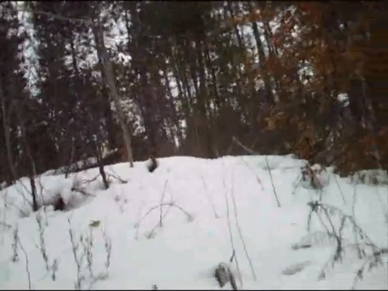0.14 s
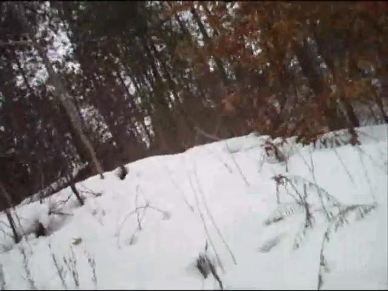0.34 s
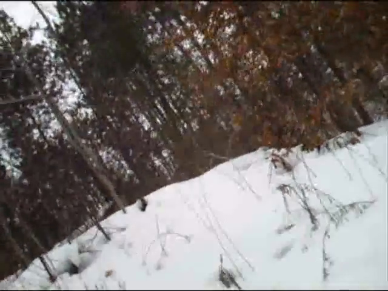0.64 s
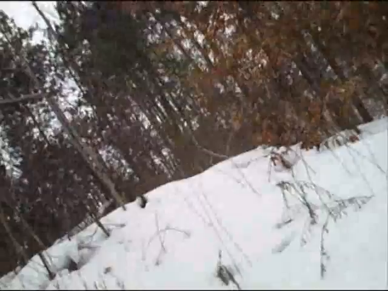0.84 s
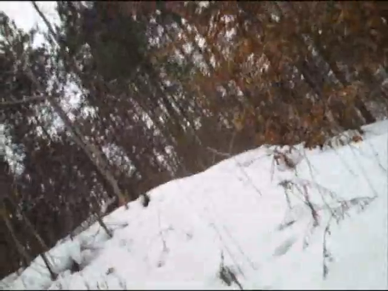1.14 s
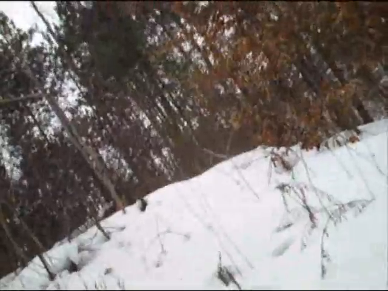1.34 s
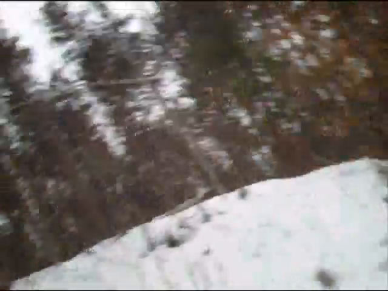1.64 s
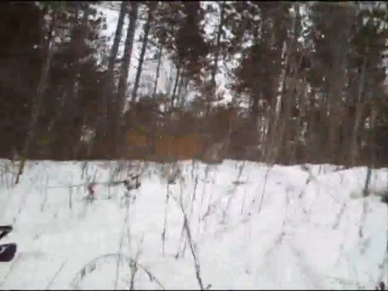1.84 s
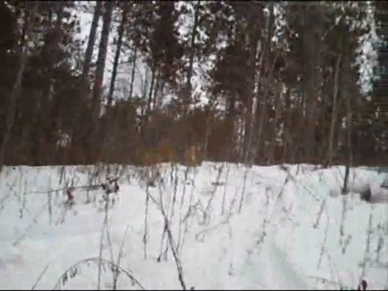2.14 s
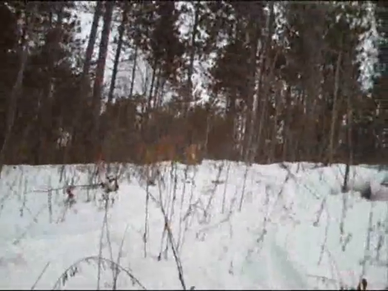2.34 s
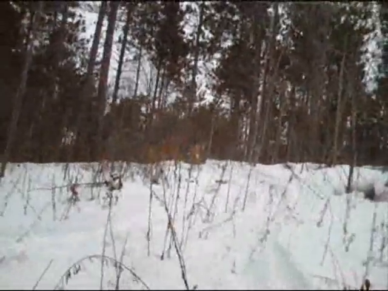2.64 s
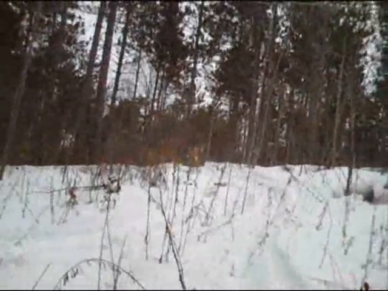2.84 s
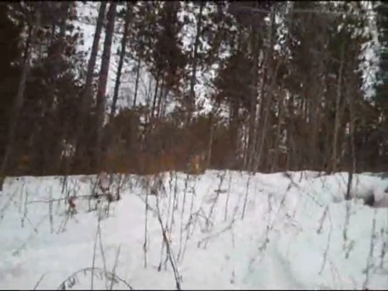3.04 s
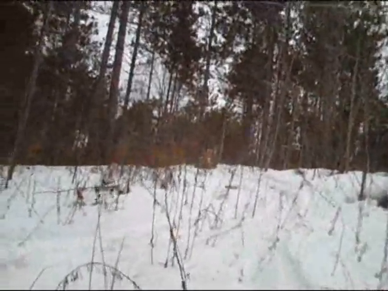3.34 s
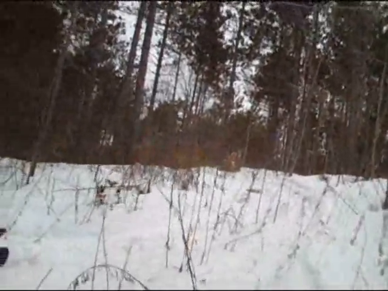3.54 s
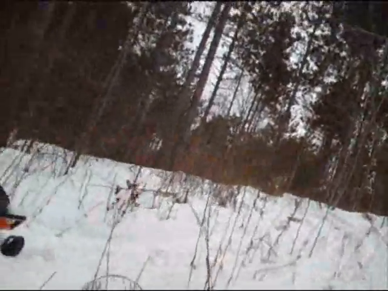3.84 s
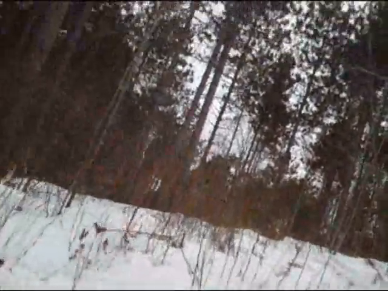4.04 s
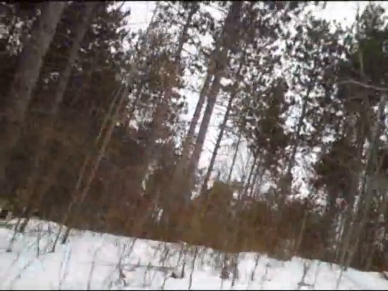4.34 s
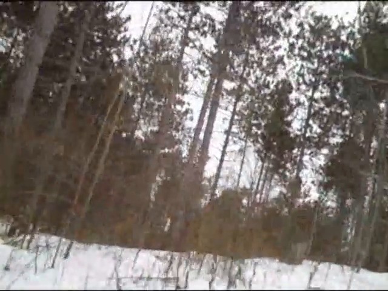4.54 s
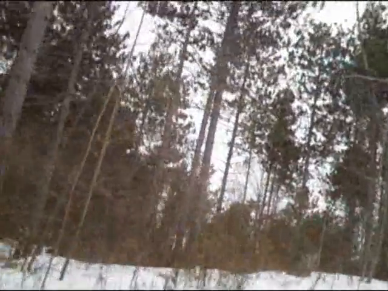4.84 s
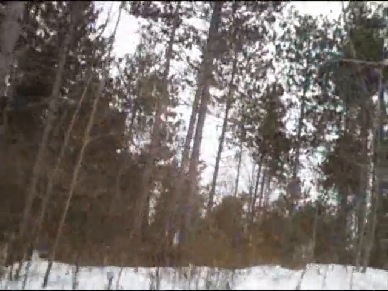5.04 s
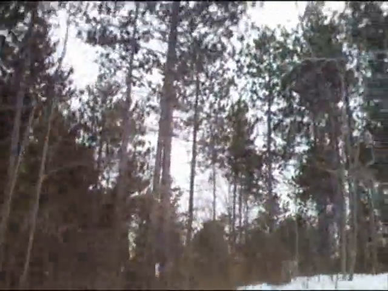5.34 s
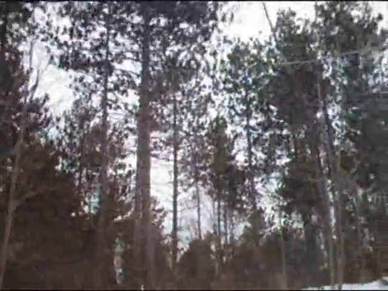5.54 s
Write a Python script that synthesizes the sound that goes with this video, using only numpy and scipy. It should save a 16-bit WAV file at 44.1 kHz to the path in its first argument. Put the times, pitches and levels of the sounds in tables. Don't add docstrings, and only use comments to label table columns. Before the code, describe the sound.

A slow old snowmobile engine throbs deep and lumpy, quickening, while loose parts rattle and sharp knocks strike the camera case in crunchy lo-fi sound.

```python
import sys
import numpy as np
from scipy import signal
from scipy.io import wavfile
from scipy.ndimage import uniform_filter1d, map_coordinates

SR = 44100
rng = np.random.default_rng(int(sys.argv[2]) if len(sys.argv) > 2 else 0)


def undo_db(level):
    steps = np.asarray(level, float) / 20
    return 10 ** steps


def log_audio(samples):
    frames = np.atleast_2d(samples).T
    limited = np.clip(frames, -1, 1)
    pcm = np.round(limited * 32767).astype(np.int16)
    wavfile.write(sys.argv[1], SR, pcm)


N = 250488
TIME = np.arange(N) / SR
MOUNT_HZ = 59
ROAR_SLOPE = 0.93

# [t/s, size 0-1]
HALF_TURN = [
    (0, 0.35),
    (.6, 1),
    (1.6, 0.78),
    (2.0, 0.1),
    (5.68, 0),
]


def curves(table):
    s, *columns = np.transpose(table)
    return [np.interp(TIME, s, c) for c in columns]


def ring(x, hz, width):
    return signal.lfilter(*signal.iirpeak(hz, hz / width, fs=SR), x)


def body(x, modes):
    y = 0
    for k, (hz, width, db) in enumerate(modes):
        wide = 1.61 * width
        y = y + (-1) ** k * undo_db(db) * ring(ring(x, hz, wide), hz, wide)
    return y / np.std(y)


def walk(rate):
    k = int(SR / rate)
    held = np.repeat(rng.standard_normal(N // k + 1), k)
    y = uniform_filter1d(uniform_filter1d(held, k), k)[:N]
    return y / np.std(y)


def orders(hz, sway_db, heave_db):
    # [t/s, level/dB]
    wobble = [(0, -35.5), (.6, -27), (1.9, -24), (2.4, -39), (2.85, -33), (3, -48), (3.8, -42), (4.1, -47),
              (4.65, -26), (5.4, -24), (5.68, -38)]
    order_levels = [-13, -11, -12.5]
    lift_db, lift_hz = 14.5, 8.9
    k = np.arange(2, 5)[:, None]
    lift = lift_db / (1 + ((k * hz - MOUNT_HZ) / lift_hz) ** 2)
    db = sway_db + np.array(order_levels)[:, None] + lift
    cancel = -2 * np.clip(curves(HALF_TURN)[0], 0, 1)
    db = db + (k == 2) * heave_db + (k == 3) * cancel
    return [curves(wobble)[0], *db]


def shake(hz, turns, order_db, mount_db):
    lead = 1.05 * curves(HALF_TURN)[0]
    crank = 0
    for k, db in enumerate(order_db):
        level = undo_db(db + 3.5 + 0.37 * walk(12.0))
        crank = crank - level * np.cos(2 * np.pi * (k + 1) * turns + (k == 1) * lead)
    nearest = np.clip(np.round(MOUNT_HZ / hz), 1, 4)
    apart_hz = hz * np.abs(MOUNT_HZ / hz - nearest)
    free = np.clip(apart_hz / 5 - .4, 0, 1)
    mount_level = undo_db(4.0 + 0.37 * walk(15))
    mount = mount_level * np.sin(2 * np.pi * np.cumsum(MOUNT_HZ * (1 + 0.01567 * walk(8))) / SR)
    jolts = body(rng.standard_normal(N), [(54.5, 5.0, 1), (33.7, 18, 0.5), (81.4, 16, 0.81)])
    top_db = -13
    return crank + undo_db(np.minimum(mount_db, top_db)) * (free * mount + undo_db(-14.0) * jolts)


def exhaust(turns, beat_db, roar_db):
    # [f/Hz, width/Hz, level/dB]
    pipe_modes = [(110.4, 15.2, 14), (137, 33, -4), (207.2, 23, -4.5), (396, 207, -21.5)]
    roar_modes = [(175, 86, 4.5), (404, 77, 0.5), (459, 49, -2.5), (585, 82, -2.5), (869, 120, -5)]
    muffler_modes = [(93.4, 12.5, 4), (226, 75, -12), (291, 8.8, -15.5)]
    count = (2 * turns).astype(int)
    half = np.clip(curves(HALF_TURN)[0], 0, 1)
    size = undo_db(2.0 * rng.standard_normal(count[-1] + 1))[count] * np.where(count % 2, half, 1)
    firings = np.diff(count, prepend=count[0]) * size
    pulse = 1.0 + 0.64 * np.exp(-(turns % 1) / 1.7)
    gas = rng.standard_normal(N) * pulse * undo_db(1.2 * walk(40))
    boom = half * undo_db(-32) * body(firings + .018 * gas, muffler_modes)
    beat = undo_db(beat_db + 1.0) * body(firings, pipe_modes)
    return beat + undo_db(roar_db + 2.0) * body(gas, roar_modes) + boom


def rattle(turns, db):
    # [f/Hz, width/Hz, level/dB]
    case_modes = [(1030, 2000, -28), (1388, 160, -11.5), (1690, 175, -22), (2057, 138, -6), (2302, 132, 2),
                  (2740, 270, -14), (3001, 109, -7.5), (3620, 540, -19.5)]
    swing = 3.6 * np.cos(4 * np.pi * turns - .6) + 0.44 * np.cos(2 * np.pi * turns - .3)
    patches = 0.98 * walk(24.395) + 4.56 * walk(80) + 3.1 * walk(250)
    chatter = 1.95 + undo_db(swing + patches)
    return undo_db(db + 4.0) * body(rng.standard_normal(N) * chatter, case_modes)


def hull(beat_db, heave_db, scrape_db):
    # [f/Hz, width/Hz, level/dB]
    drum_modes = [(184, 84, 3.5), (270, 84, -4.5)]
    scrape_modes = [(401, 130, 0.86), (563, 125, -2.8)]
    drum_level = undo_db(-13 + beat_db + 0.4 * heave_db + 2.0 * walk(30))
    drum = drum_level * body(rng.standard_normal(N), drum_modes)
    return drum + undo_db(-48.5 + scrape_db + 3.6 * walk(45)) * body(rng.standard_normal(N), scrape_modes)


def blows(hz):
    # [t/s, peak level/dB, ring f/Hz, length/s]
    lone = [(0.015, -22.5, 2275, 0.013), (1.048, -20, 2146, 0.0064), (1.834, -14, 2360, 0.0053),
            (1.894, -13.5, 2110, 0.0025), (1.986, -22, 2190, 0.013), (2.546, -27, 2200, 0.0042),
            (2.6808, -19.5, 2295, .005), (2.738, -21, 2244, 0.0089), (3.7135, -21, 2384, 0.0099),
            (3.788, -18.5, 2346, 0.022), (3.8214, -17.5, 2360, 0.0045), (3.836, -20.5, 2285, 0.0076),
            (3.9867, -16, 2245, .015), (4.0935, -16, 2330, 0.011), (4.173, -12.5, 2346, 0.0099),
            (4.35, -20.5, 2318, 0.011), (4.475, -11.5, 2346, 0.0049), (4.522, -12.5, 2302, 0.012),
            (4.9464, -17, 2280, .0057), (5.287, -8.5, 2210, 0.0046), (5.325, -21.5, 2400, 0.011),
            (5.3748, -6, 2315, 0.0032), (5.4814, -18.5, 2194, .0064), (5.569, -22, 2290, 0.003)]
    glancing = [
        (.296, -17.5, 2010, 0.0062),
        (0.342, -22, 2220, 0.0056),
        (1.759, -22, 2500, 0.0021),
        (1.765, -29, 2290, 0.0039),
        (1.9143, -14.5, 2190, 0.0019),
        (3.639, -24.5, 2240, 0.0065),
        (3.679, -22.5, 2930, 0.0059),
    ]
    heavy = [
        (1.0046, -23, 2240, .006),
        (1.726, -14, 2266, 0.0099),
        (1.8415, -8.5, 2196, 0.0055),
        (1.922, -10.5, 2165, 0.0056),
        (2.226, -20, 2320, 0.014),
        (4.007, -10.5, 2320, 0.0086),
        (5.4205, -8, 2280, .0062),
    ]
    # [first t/s, last t/s, first level/dB, last level/dB, ring f/Hz]
    runs = [
        (0.786, 1.0822, -23.5, -16.5, 2260),
        (1.2151, 1.414, -21, -28.5, 2270),
        (2.05, 2.233, -23.5, -18, 2246),
        (2.282, 2.503, -19, -15.5, 2298),
        (3.9615, 4.2143, -16, -17, 2180),
        (4.6102, 4.746, -9, -9.5, 2148),
        (4.7915, 4.9686, -7, -9, 2143),
        (5.012, 5.1818, -13, -14, 2174),
    ]
    # [thud level/dB, edge level/dB]
    run_colour = (-16, -14)
    lone_colour = (-16.5, -45)
    glancing_colour = (-9, 0.5)
    heavy_colour = (-10.5, -7)
    length_s, scatter_db, scatter_hz = .0055, 1.2, 30
    rows = []
    for table, colour in [(lone, lone_colour), (glancing, glancing_colour), (heavy, heavy_colour)]:
        rows += [(s, db, f, *colour, length) for s, db, f, length in table]
    for first, last, first_db, last_db, f in runs:
        count = 1 + round((last - first) * hz[int((first + last) / 2 * SR)])
        for u, (a, b) in zip(np.linspace(0, 1, count), rng.standard_normal((count, 2))):
            db = first_db + u * (last_db - first_db) + scatter_db * a
            rows.append((first + u * (last - first), db, f + scatter_hz * b, *run_colour, length_s))
    return rows


def knocks(rows):
    out = np.zeros(N + 2048)
    t = np.arange(2048) / SR
    noise = rng.standard_normal((len(rows), 2048))
    for (s, db, hz, thud_db, edge_db, length), grit in zip(rows, noise):
        contact = np.minimum(t / 0.0012, 1) * np.exp(-(t / max(length, .002)) ** 1.4)
        tone = contact * np.sin(2 * np.pi * hz * t + 0.06 * np.cumsum(grit))
        push = grit * contact
        thud = ring(ring(push, 406.0, 240.0), 406.0, 240.0)
        edge = ring(push, 2800.0, 470.0) + 0.3 * ring(push, 2420.0, 250.)
        hiss = ring(push, 2660.0, 750.0)
        parts = [(tone, 0), (thud, thud_db), (edge, edge_db), (hiss, -22.0)]
        start = int(s * SR)
        out[start:start + 2048] += sum(undo_db(db + d) * p / np.abs(p).max() for p, d in parts)
    return out[:N]


def squeak():
    # [t/s, level/dB]
    song = [
        (0.275, -43),
        (0.293, -17.5),
        (.322, -20.5),
        (.335, -25),
        (0.354, -25.5),
        (0.375, -53),
    ]
    # [t/s, peak level/dB]
    ticks = [
        (0.1834, -34),
        (0.2259, -31),
        (0.2624, -30),
        (0.4499, -44),
    ]
    gate = np.clip(np.minimum(TIME - song[0][0], song[-1][0] - TIME) / .006, 0, 1)
    phase = 2 * np.pi * np.cumsum(3322 * (1 + .004 * walk(90) + .008 * walk(500))) / SR
    grit = body(rng.standard_normal(N), [(3360, 520, 8), (3880, 560, -18)])
    level = gate * undo_db(curves(song)[0] + 2.5 + 1.5 * walk(71.5))
    out = level * (np.sin(phase) + 0.2 * np.sin(.9 * phase) + 0.11 * grit)
    tick = np.sin(2 * np.pi * 3990 * TIME) + .3 * grit
    for s, peak_db in ticks:
        out = out + undo_db(peak_db - 1.5) * np.exp(-((TIME - s - .005) / .0045) ** 2) * tick
    return out


def bumps():
    # [t/s, length/s, extra heave level/dB, extra roar level/dB]
    ground = [(0.313, .04, -18, 3), (0.443, 0.021, -14, 4), (0.624, 0.034, 13.5, 3),
              (0.812, 0.038, 14, -1.5), (1.174, 0.16, 10.5, 8), (1.736, 0.018, 8, 14.5),
              (1.848, 0.016, 12, 21), (1.945, 0.017, -10, 0), (2.25, .05, -9, 11.5), (3.215, 0.13, 2, 13.5),
              (3.592, 0.11, 2, 10), (3.88, 0.036, -8, 0), (4.066, 0.13, 10, 6.5), (4.333, 0.12, 10.5, 5.5),
              (4.674, .1, 0, 1), (4.996, .04, 16, -1), (5.437, 0.1, 4, 10.5), (5.66, 0.068, 14.5, 6)]
    s, length, *db = np.transpose(ground)
    return np.array(db) @ np.exp(-((TIME - s[:, None]) / np.maximum(length, .01)[:, None]) ** 2)


def kicks():
    # [t/s, peak level/dB]
    jolt_table = [
        (0.797, -13),
        (1.847, -8.5),
        (3.084, -10.5),
    ]
    s, db = np.transpose(jolt_table)
    t = np.maximum(TIME - s[:, None], 0)
    return undo_db(db) @ (np.exp(-t / 0.033) * np.sin(2 * np.pi * MOUNT_HZ * t))


def scene():
    # [t/s, turning rate f/Hz]
    speed = [(0, 12), (.84, 13.75), (1.2, 14.4), (1.6, 15.6), (1.8, 16.2), (2.06, 16.7), (2.5, 19.1),
             (2.69, 20.6), (2.97, 23), (3.07, 22.5), (3.49, 24.2), (3.69, 24.9), (3.97, 23.7), (4.41, 22.3),
             (4.89, 22), (5.17, 22.3), (5.38, 22.8), (5.68, 24.7)]
    # [t/s, level/dB]
    sway = [(0.0, -46), (0.05, -31.5), (0.43, -19), (0.9, -21.5), (1.19, -10.5), (2.29, -27.5),
            (2.67, -21.5), (2.8, -28), (3.11, -25.5), (3.15, -17), (3.46, -28), (3.91, -24), (4.1, -17.5),
            (4.16, -29), (4.89, -19.5), (4.95, -32.5), (5.39, -18), (5.68, -29.5)]
    # [t/s, level/dB]
    load = [(0, -56), (.45, -50), (.72, -35.5), (.98, -42.5), (1.25, -36), (1.7, -43), (1.9, -38),
            (2.45, -32.5), (2.6, -36), (2.8, -28), (3.1, -33.5), (3.25, -30), (3.55, -33), (3.9, -24.5),
            (4.25, -29), (4.55, -27), (5.6, -28), (5.68, -31)]
    # [t/s, level/dB]
    loose = [(0.0, -46), (0.25, -40), (0.62, -39.5), (0.98, -34.5), (1.33, -36.5), (1.72, -38), (1.87, -34),
             (2.18, -39), (2.67, -36.5), (2.9, -35), (3.65, -37.5), (3.99, -34), (4.13, -30.5), (4.29, -34),
             (4.49, -33), (4.71, -30), (4.95, -30), (5.68, -30.5)]
    hz, sway_db, beat_db, loose_db = (curves(table)[0] for table in (speed, sway, load, loose))
    heave_db, bump_roar_db = bumps()
    roar_db = -43.5 + ROAR_SLOPE * (loose_db + 35.5) + 0.47 * bump_roar_db
    scrape_db = bump_roar_db + ROAR_SLOPE * (loose_db + 36)
    turns = np.cumsum(hz) / SR
    turns += 1 - turns[int(4.793 * SR)] % 1
    dry = shake(hz, turns, orders(hz, sway_db, heave_db), sway_db - 1)
    dry = dry + exhaust(turns, beat_db, roar_db)
    dry = dry + rattle(turns, loose_db)
    dry = dry + hull(beat_db, heave_db, scrape_db)
    dry = dry + knocks(blows(hz))
    dry = dry + squeak()
    dry = dry + kicks()
    return dry[None]


def low_pass(x):
    return signal.sosfilt(signal.butter(12, 12930, fs=SR, output="sos"), x)


def record(dry):
    leak_hz, coupling_hz, hold_hz = 6, 40, 8012.66
    deep, thin = ([1, -np.exp(-2 * np.pi * hz / SR)] for hz in (leak_hz, coupling_hz))
    lurch_s, lurch_length_s, lurch_room = 1.186, .084, .3
    room = 1.3 - (1.3 - lurch_room) * np.exp(-((TIME - lurch_s) / lurch_length_s) ** 8)
    swing = signal.lfilter(thin, deep, dry[0])
    lost = np.minimum(swing + room, 0)
    membrane = swing - lost + .55 * (lost - uniform_filter1d(lost, size=45))
    capsule = signal.lfilter(deep, thin, membrane) + undo_db(-58) * rng.standard_normal(N)
    limited = 1.283 * np.tanh(capsule / 1.325)
    band = signal.sosfilt(signal.ellip(6, .3, 50, 4100, fs=SR, output="sos"), limited)
    places = np.arange(int(N * hold_hz / SR) + 1) * SR / hold_hz
    samples = map_coordinates(band, [places], order=3, mode="nearest")
    steps = samples[(TIME * hold_hz).astype(int)]
    top = signal.sosfilt(signal.ellip(8, .2, 60, 12780, fs=SR, output="sos"), steps)
    return low_pass(top[None])


dry = scene()
out = record(dry)
log_audio(out)
```